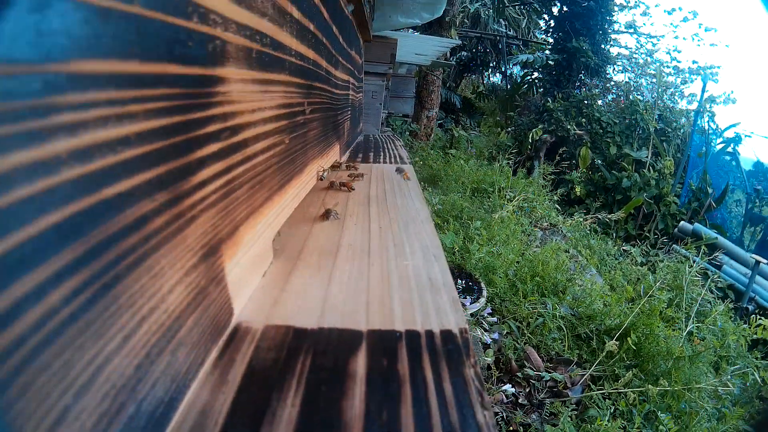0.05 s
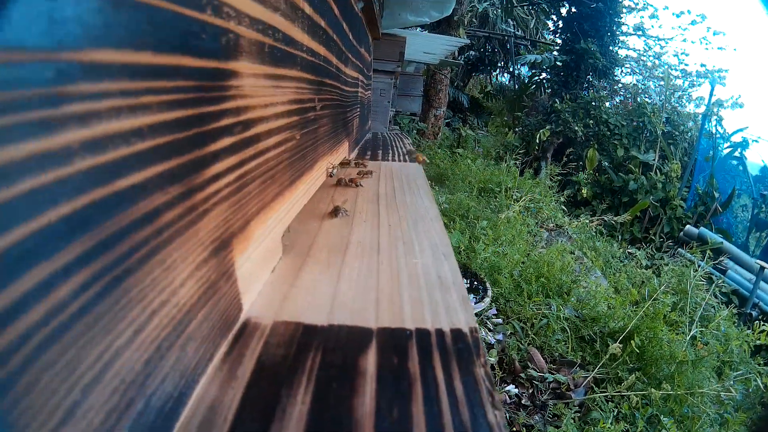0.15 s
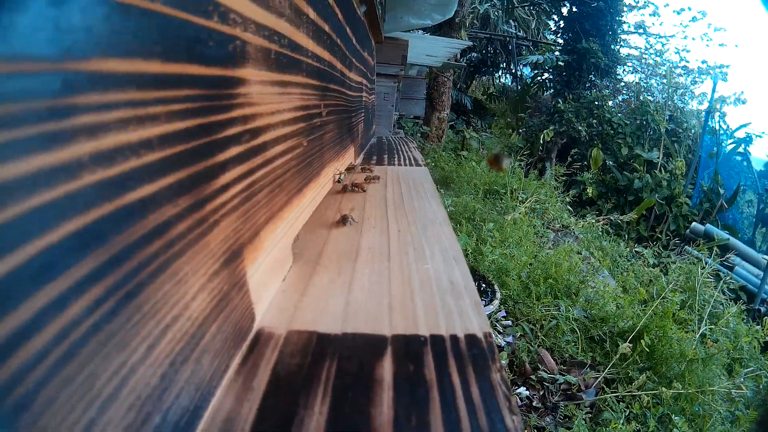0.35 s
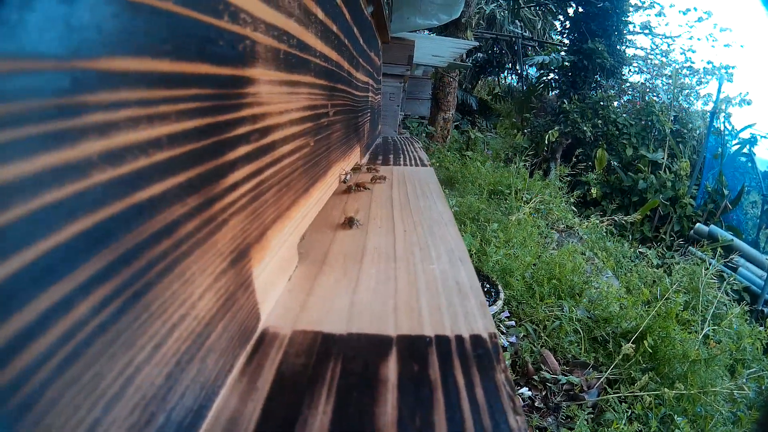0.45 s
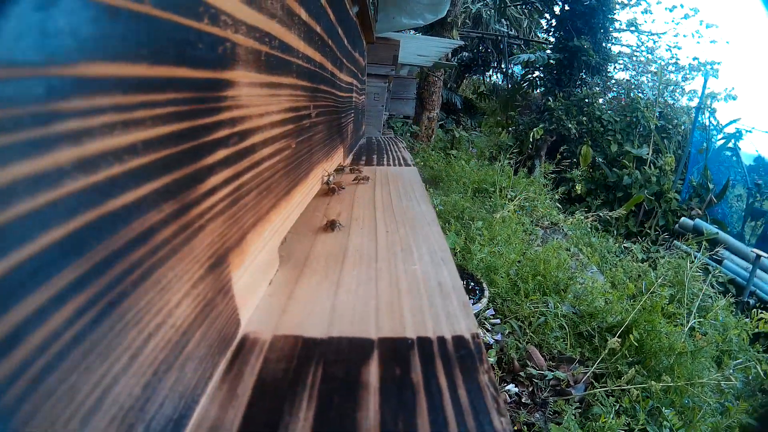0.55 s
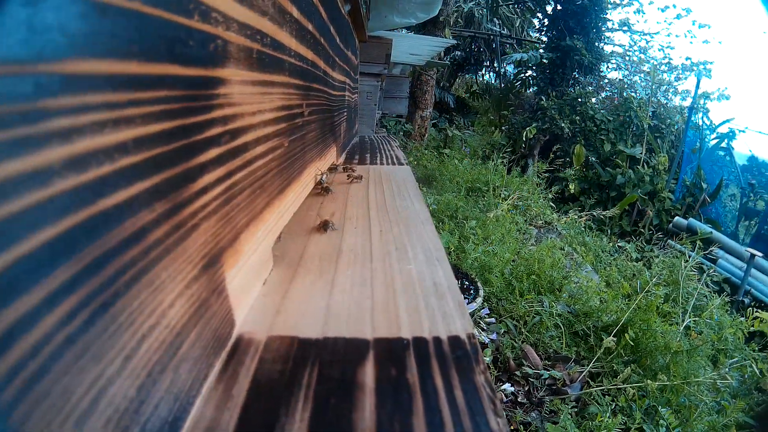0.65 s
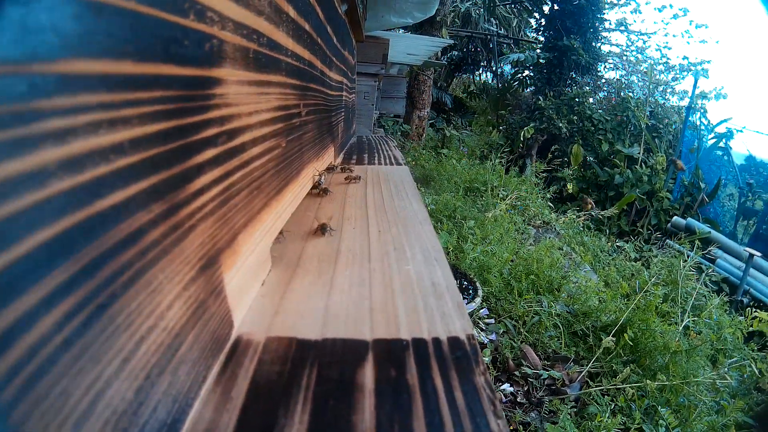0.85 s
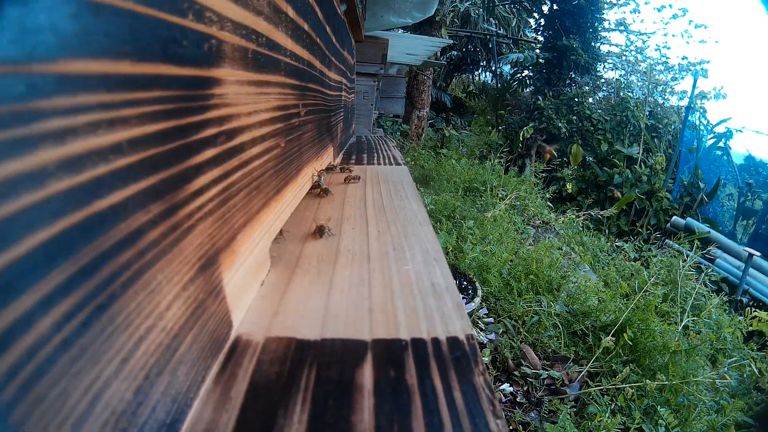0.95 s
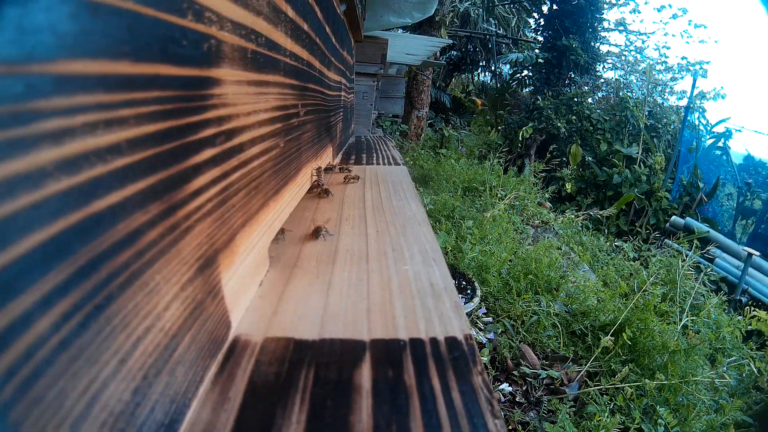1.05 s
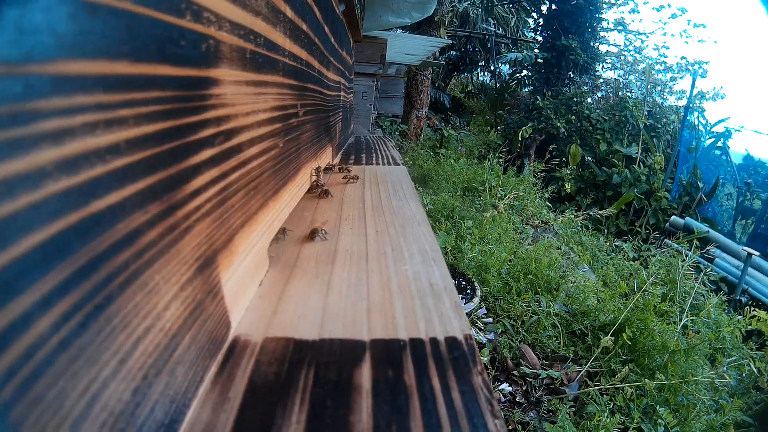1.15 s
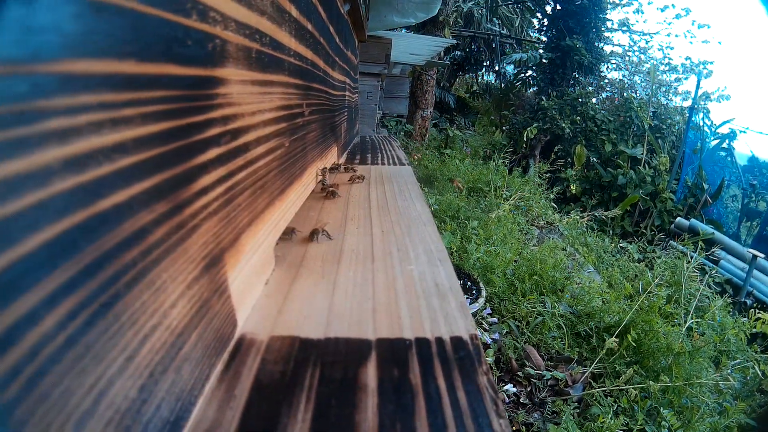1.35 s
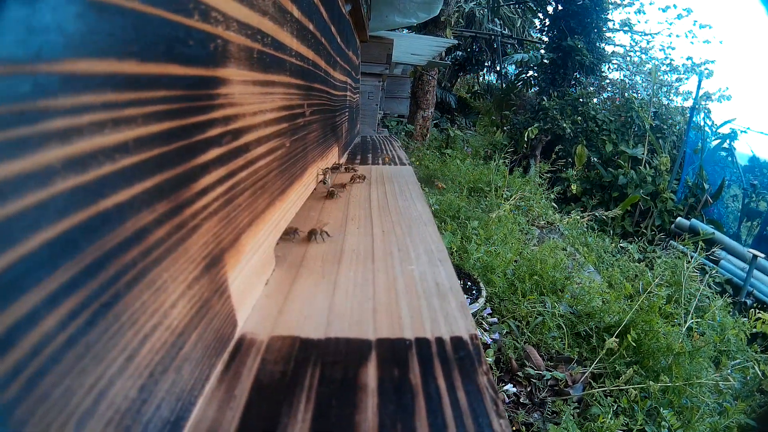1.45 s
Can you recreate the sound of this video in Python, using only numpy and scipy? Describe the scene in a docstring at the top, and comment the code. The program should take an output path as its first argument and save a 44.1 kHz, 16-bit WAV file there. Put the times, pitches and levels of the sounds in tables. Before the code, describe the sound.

A small camera scrapes and knocks along a wooden board, heard through its plastic case.

```python
"""A small camera is nudged along the wooden landing board of a beehive, heard through its plastic case.
A little wind rumble, quiet outdoor air and microphone hiss lie under it from the start.
First the case scrapes over the grain in short strokes, knocks once, ticks on ridges and bumps softly.
Just after half a second it judders as it sticks and slips, then eases into light slides.
In the last half second come three more knocks, among small scrapes, ticks, bumps and judders."""
import sys
import numpy as np
from scipy import signal
from scipy.fft import rfft, irfft
from scipy.io import wavfile
from scipy.ndimage import uniform_filter1d

SR = 44100
rng = np.random.default_rng(int(sys.argv[2]) if len(sys.argv) > 2 else 0)


def waveform_to_disk(signal):
    """Save audio, clipped to [-1, 1], as 16-bit WAV at the path in sys.argv[1]."""
    frames = np.transpose(np.atleast_2d(signal))
    scaled = np.clip(frames, -1, 1) * 32767
    samples = np.round(scaled).astype(np.int16)
    wavfile.write(sys.argv[1], SR, samples)


N = 66150  # 1.5 seconds

# How strongly the case rings when touched. Each row: frequency in Hz, relative level in dB.
CASE_TONE = [(40, -55), (100, -16.5), (170, -10.5), (245, -13), (295, -5), (345, -10), (480, -15.5),
             (610, -9.5), (760, -11.5), (980, -14), (1110, -6.5), (1225, 2), (1420, -6), (1700, -1.5),
             (1970, -3), (2150, -14), (2480, -23), (2830, -18.5), (3130, -11.5), (3460, -27.5), (3880, -16),
             (4170, -19.5), (4350, -34.5), (4600, -28.5), (5000, -49), (5400, -27.5), (5920, -42),
             (6200, -30.5), (6650, -44), (7150, -38.5), (8700, -49.5), (9900, -44.5), (10700, -53),
             (11600, -47.5), (13000, -55), (16000, -62)]


def undb(db):
    """Turn decibels into a number to multiply by."""
    return 10 ** (np.asarray(db) / 20)


def unit(x):
    """Scale a sound so that its average level (rms) is 1."""
    return x / np.sqrt(np.mean(x ** 2))


def bins():
    """The frequency in Hz of each slot in the sound's spectrum."""
    return np.maximum(np.arange(N // 2 + 1) * SR / N, 1)


def curve(points):
    """Join (Hz, dB) points into a tone curve with a level for every frequency."""
    hz, db = np.array(points, float).T
    return np.interp(np.log(bins()), np.log(hz), db)


def colour(x, db):
    """Shape a sound with a tone curve, so that the ringing comes after each hit."""
    cepstrum = irfft(np.log(undb(db)), N)
    fold = 1 + np.sign(N / 2 - np.arange(N))  # moves ringing from before a hit to after it
    fold[0] = 1
    return irfft(rfft(x) * np.exp(rfft(cepstrum * fold)), N)


def wind():
    """Wind makes a low rumble that rises and falls."""
    # The rumble's tone. Each row: frequency in Hz, relative level in dB.
    tone = [(10, -17.5), (25, -15.5), (37, -5.5), (60, -22.5), (110, -32.5), (300, -60)]
    # The gusts. Each row: time in seconds, level in dB.
    gusts = [(0.0, -41), (0.032, -44.5), (0.192, -70), (0.292, -49), (0.312, -46), (0.35, -42),
             (0.462, -59), (0.512, -51), (0.784, -55), (0.956, -76), (1.378, -49.5), (1.5, -71)]
    level_db = np.interp(np.arange(N) / SR, *np.array(gusts).T)
    return unit(colour(rng.standard_normal(N), curve(tone))) * undb(level_db)


def air_and_hiss(level_db=-60):
    """Outdoor air and microphone hiss blend into one steady noise."""
    # The noise's tone. Each row: frequency in Hz, relative level in dB.
    tone = [(20, -11), (100, -2.5), (170, -3), (300, -4.5), (720, -11.5), (1200, -9.5), (1800, -3.5),
            (2450, -18.5), (3150, -16), (3550, -21.5), (6700, -24.5), (15500, -27)]
    return unit(colour(rng.standard_normal(N), curve(tone))) * undb(level_db)


def whine(hz=6804, level_db=-84):
    """The electronics give off a very faint, high note."""
    return undb(level_db) * unit(np.sin(2 * np.pi * hz * np.arange(N) / SR))


def stroke(start, end, first_db, last_db, tone_db):
    """One move over the grain: thousands of tiny catches a second make the case ring."""
    catches_per_s, scatter_db, attack_s, release_s = 6000, 1, 0.0078, 0.0049
    t = np.arange(N) / SR
    catches = (rng.random(N) < catches_per_s / SR) * rng.choice([-1, 1], N)
    catches = catches * undb(scatter_db * rng.standard_normal(N))
    fade_in = np.clip((t - start) / attack_s + .5, 0, 1)
    fade_out = np.exp(-np.maximum(t - end, 0) / release_s)
    level = undb(np.interp(t, [start, end], [first_db, last_db]))
    force = unit(catches) * fade_in * fade_out * level
    return colour(force, tone_db) / np.sqrt(np.mean(undb(tone_db) ** 2))


def scrapes(bass_hz=766, treble_hz=2620):
    """The case rubs firmly on the wood, each stroke with its own bass and treble."""
    # Each row: start and end in seconds, first and last level in dB, bass and treble change in dB.
    firm_strokes = [(-.005, 0.021, -33, -36.5, 0, -1.5), (0.08, 0.109, -44, -60, 14, -11),
                    (0.134, 0.156, -49.5, -45, 11, -3), (0.163, 0.194, -40, -40, 10, -1.5),
                    (0.214, 0.231, -32, -36, 9, 6), (0.23, 0.271, -26.5, -28.5, -3.5, 0.5),
                    (0.269, 0.278, -23, -27.5, 7.5, 9), (0.277, 0.324, -54, -36, -8, 3.5),
                    (0.326, 0.329, -24, -29.5, 1.5, -4), (0.334, 0.42, -34, -34, 2.5, 5.5),
                    (0.403, 0.461, -53, -54, 2.5, 10), (0.517, 0.578, -53.5, -37, 7, 5.5),
                    (0.555, 0.577, -32.5, -29.5, 2.5, -1.5), (0.569, 0.614, -39.5, -32, -1.5, -3),
                    (0.621, 0.645, -39.5, -39.5, 3, -2.5), (0.653, 0.722, -46.5, -46.5, 9, 5.5),
                    (0.783, 0.815, -59, -54.5, 10.5, 1.5), (1.248, 1.261, -36.5, -35, -2, -4.5),
                    (1.342, 1.354, -41.5, -47.5, 13, -3), (1.366, 1.402, -56, -49, 15.5, 5.5)]
    bass = 1 / (1 + (bins() / bass_hz) ** 4)
    treble = 1 / (1 + (treble_hz / bins()) ** 4)
    case = curve(CASE_TONE)
    return sum(stroke(start, end, first_db, last_db, case + bass_db * bass + treble_db * treble)
               for start, end, first_db, last_db, bass_db, treble_db in firm_strokes)


def fading_note(start, hz, fade_s):
    """One pure vibration that dies away by 60 dB in fade_s seconds."""
    age = np.maximum(np.arange(N) / SR - start, 0)
    return np.sin(2 * np.pi * hz * age) * np.exp(-np.log(1000) * age / fade_s)


def knocks(crunch_db=3.5, crunch_fade_s=0.017, crunch_above_hz=2320):
    """The case hits the board: wood fibres crunch under the blow and the case rings on."""
    # The frequencies in Hz at which each blow's tone is set.
    bands_hz = [150, 600, 1200, 1900, 4200, 8300, 13000]
    # Each row: time in seconds, strength in dB, then a boost or cut in dB for each of bands_hz.
    blows = [(0.2063, 18, -3, 8.5, 11.9, -1, -4.5, -5, -11), (1.148, 10, -1, 4, 7.9, 14, 5, 8.5, -0.5),
             (1.2472, -2, 19, 1.5, 16.3, -2.5, -29, -24, -28), (1.334, -8, 15.5, -1, 16.5, 2, -16, -1, -15)]
    # Notes left ringing. Each row: pitch in Hz, relative level in dB, seconds to fade by 60 dB.
    notes = [(311, -49, 0.066), (497, -47, 0.079), (1220, -60, 0.041), (1870, -50, 0.093),
             (2690, -36, 0.0085), (4180, -34, 0.018), (5440, -41.5, 0.0093), (7960, -45.5, 0.0075)]
    out, click, t = 0, np.eye(1, N)[0], np.arange(N) / SR
    case = curve(CASE_TONE)
    ringing = sum(undb(db) * fading_note(0, hz, fade_s) for hz, db, fade_s in notes)
    body = colour(click, case) + ringing / 2
    travel_s = 0.000767  # a bending wave's trip to the microphone at 1000 Hz; treble arrives sooner
    travel_cycles = 2 * travel_s * np.sqrt(1000 * bins())
    bass_cut = -10 * np.log10(1 + (crunch_above_hz / np.maximum(bins(), 300)) ** 6)
    for when, db, *bands_db in blows:
        burst = rng.standard_normal(N) * np.exp(-np.log(1000) * t / crunch_fade_s)
        crunch = undb(crunch_db) * colour(burst / np.linalg.norm(burst), case + bass_cut)
        hit = colour(body + crunch, db + curve(list(zip(bands_hz, bands_db))))
        delay = np.exp(-2j * np.pi * (when * bins() + travel_cycles))
        out = out + irfft(rfft(hit) * delay, N)
    return out


def snags():
    """The case catches on a ridge of the grain and ticks."""
    # Each row: time in seconds, peak level in dB.
    ridges = [(0.2325, -40), (.243, -32), (0.2636, -22), (0.3308, -30), (.558, -26), (1.2962, -38.5),
              (1.435, -43.5)]
    tick = colour(np.eye(1, N)[0], curve(CASE_TONE))
    tick = tick / np.abs(tick).max()
    samples = np.arange(N)
    return sum(undb(db) * np.interp(samples - round(when * SR), samples, tick, left=0)
               for when, db in ridges)


def bumps(attack_s=0.0025):
    """The whole case bounces softly on the board as it settles."""
    # Each row: time in seconds, pitch in Hz, level in dB, seconds to fade by 60 dB.
    bounces = [(0.2774, 159.5, -20.5, 0.05), (0.328, 177, -28.5, 0.02), (0.521, 133, -43, 0.062),
               (0.681, 168, -43, 0.16), (.785, 161, -46, 0.1), (1.1488, 151, -33.5, 0.12),
               (1.249, 135, -39.5, 0.097), (1.265, 142, -35, 0.088), (1.336, 252, -22, 0.019)]
    t = np.arange(N) / SR
    return sum(undb(db) * fading_note(when, hz, fade_s) * np.clip((t - when) / attack_s, 0, 1)
               for when, hz, db, fade_s in bounces)


def slides(width_octaves=0.25, outside_db=-9.5):
    """A light touch whispers, stirring mostly the middle notes of the case."""
    # Each row: start and end in seconds, first and last level in dB, centre frequency in Hz.
    light_strokes = [(0.46, 0.514, -54.5, -62.5, 2070), (0.859, 0.929, -61.5, -50, 1630),
                     (0.934, 0.985, -55, -54.5, 1780), (1.054, 1.16, -65.5, -58, 1800),
                     (1.164, 1.242, -47.5, -45, 2020), (1.264, 1.278, -47, -44, 1870),
                     (1.294, 1.303, -47, -42.5, 1900), (1.438, 1.45, -48, -40.5, 1480),
                     (1.456, 1.507, -50.5, -56, 1370)]
    out, case = 0, curve(CASE_TONE)
    for start, end, first_db, last_db, hz in light_strokes:
        focus = np.exp(-.5 * (np.log2(bins() / hz) / width_octaves) ** 2)
        out = out + stroke(start, end, first_db, last_db, case + outside_db * (1 - focus))
    return out


def judders(pitch_spread=0.028, strength_spread=0.54):
    """The sliding case sticks and slips, swells into one rough, wavering note and lets go."""
    # Each row: middle time in seconds, half the length in seconds, pitch in Hz, level in dB.
    notes = [(0.582, 0.028, 603.7, -38), (0.6, 0.028, 1705, -33.5), (1.198, 0.064, 1880, -47.5),
             (1.207, 0.069, 3150, -59), (1.3, 0.0081, 3120, -61), (1.441, 0.023, 2270, -60.5),
             (1.448, .018, 4620, -66)]
    out, t = 0, np.arange(N) / SR
    for middle, half, hz, db in notes:
        waver, grip = (unit(uniform_filter1d(rng.standard_normal(N), size=150)) for _ in range(2))
        swell = np.cos(np.pi / 2 * np.clip((t - middle) / half, -1, 1))
        ring = np.sin(2 * np.pi * np.cumsum(hz * (1 + pitch_spread * waver)) / SR)
        out = out + undb(db) * swell * unit(ring * (1 + strength_spread * grip))
    return out


def scene():
    """Add the sounds of the case and the background into one channel."""
    contact = scrapes() + slides() + snags() + knocks() + bumps()
    background = wind() + air_and_hiss() + whine()
    return (contact + background + judders())[None]


def record(dry):
    """The camera cuts off the highest treble."""
    top_hz = 15800
    return signal.sosfilt(signal.ellip(10, .1, 70, top_hz, fs=SR, output="sos"), dry)


dry = scene()
out = record(dry)
waveform_to_disk(out)
```